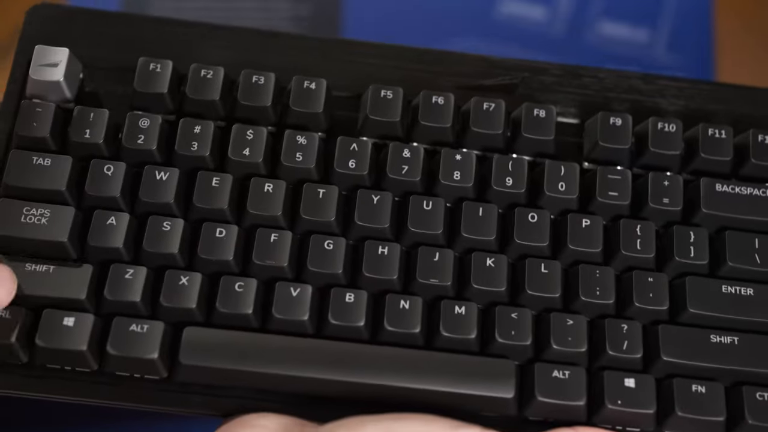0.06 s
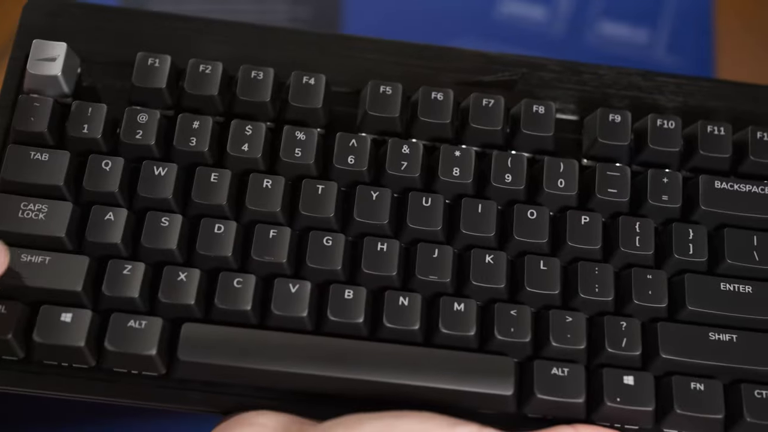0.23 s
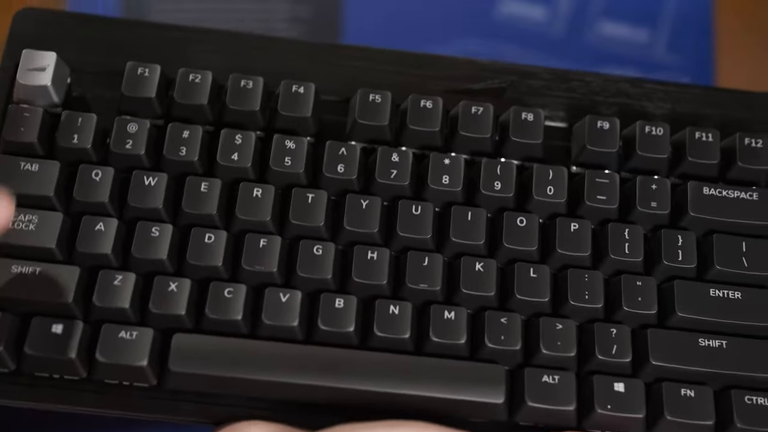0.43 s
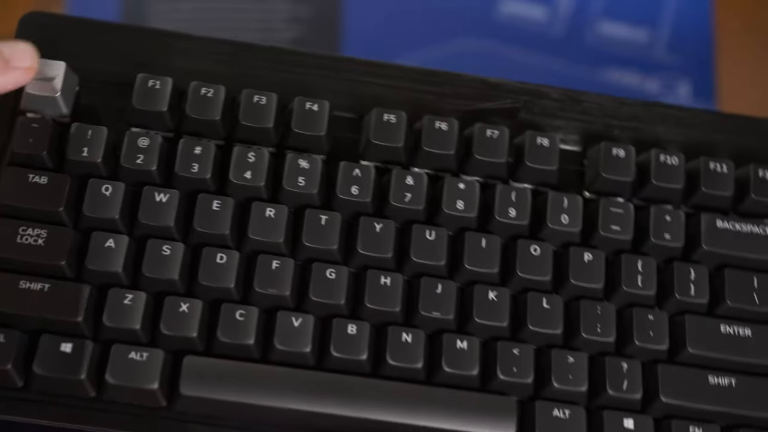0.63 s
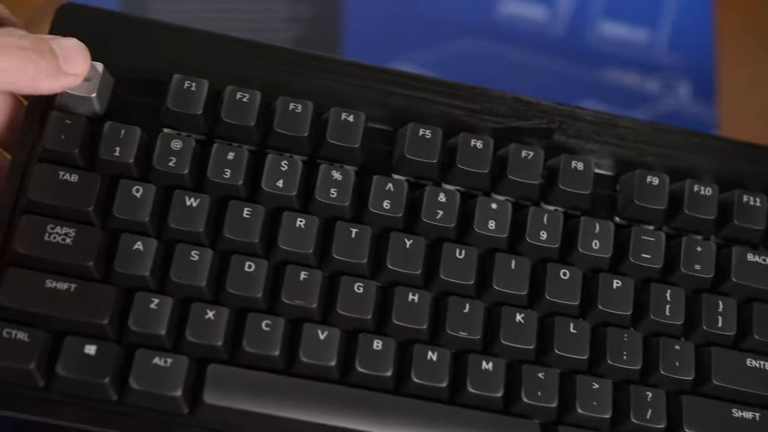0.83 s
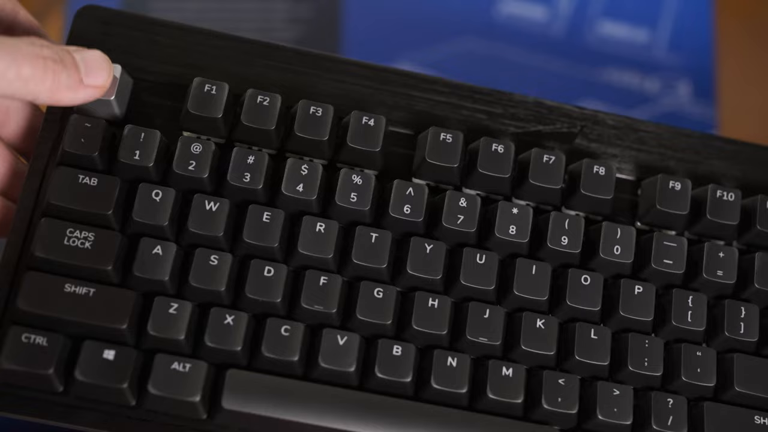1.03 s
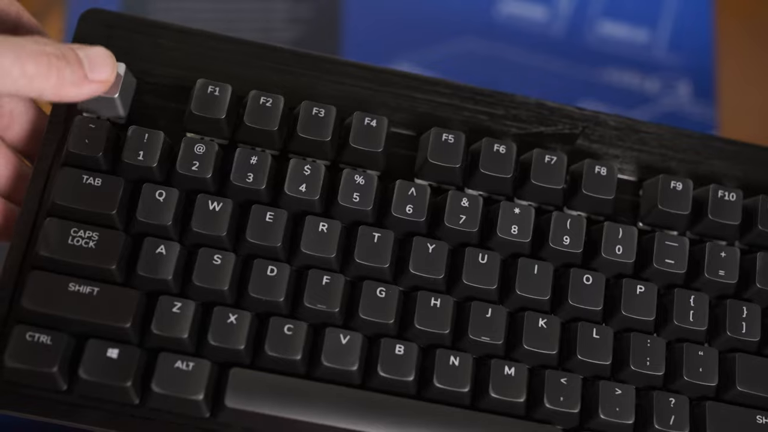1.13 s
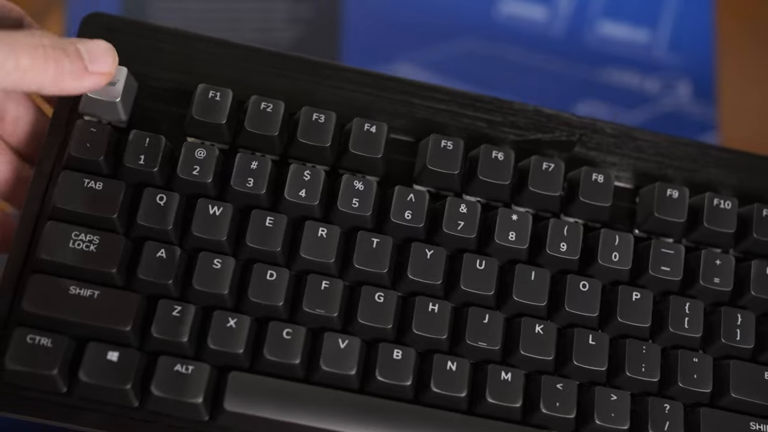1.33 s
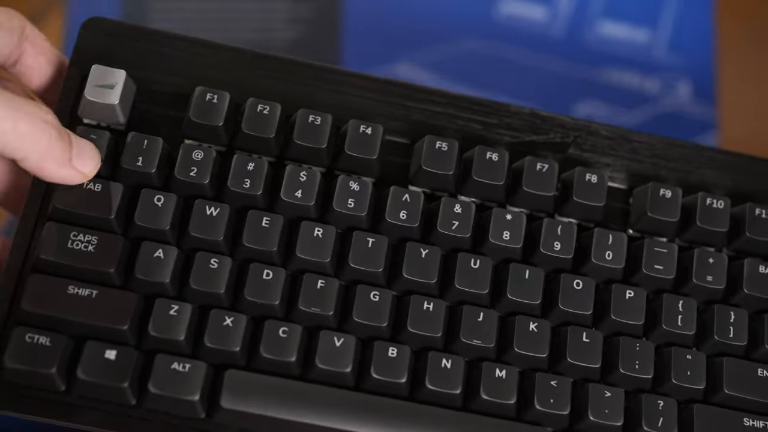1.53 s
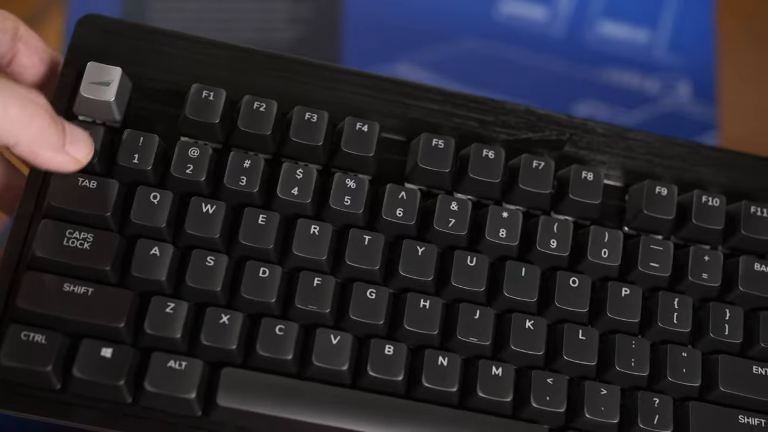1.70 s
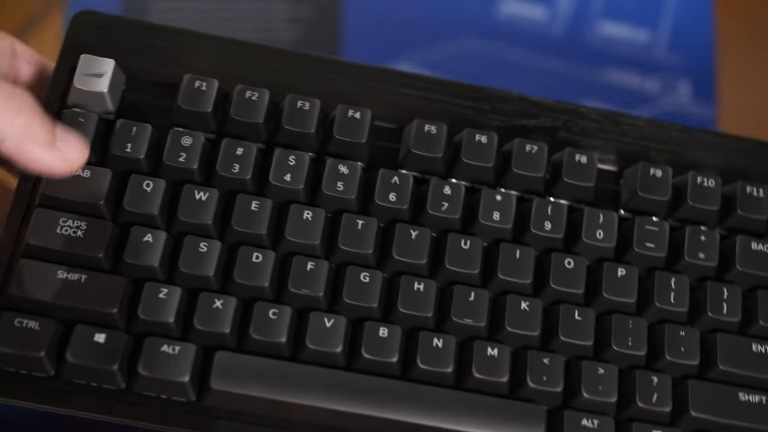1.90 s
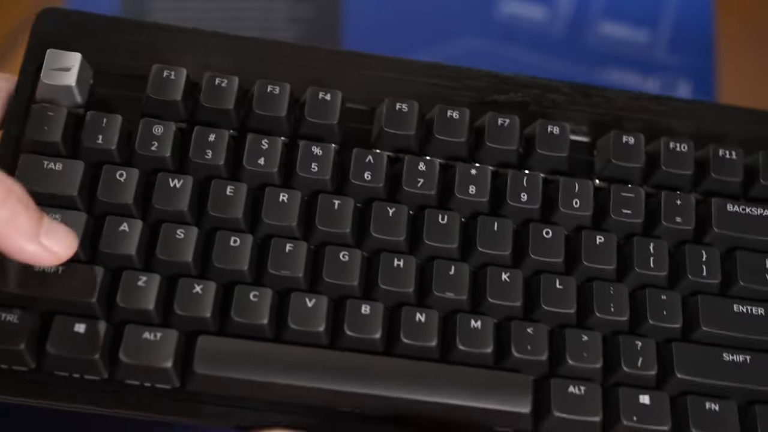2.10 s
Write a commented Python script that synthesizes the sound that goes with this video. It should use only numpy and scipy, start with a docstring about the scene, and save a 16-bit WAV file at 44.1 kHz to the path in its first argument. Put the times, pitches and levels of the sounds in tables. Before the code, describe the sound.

Seven sharp plastic key presses with softer return clicks, irregularly spaced, over a faint fan hum

```python
"""Faint fingertip ticks and a rustle come first, over a hum of fans; then a key clacks back up.
Three keys of a plastic mechanical keyboard are pressed and let go in turn, close to a mono microphone.
A key is a snap of its cap, a short ringing of the board, and bright ringing mixed with noise.
Ticks and slides of the fingertip are shaped noise; a bare room answers after a short gap.
The fans are steady coloured noise with two wavering low tones."""
import sys
import numpy as np
from scipy import signal
from scipy.fft import rfft, irfft
from scipy.io import wavfile

SR = 44100
rng = np.random.default_rng(int(sys.argv[2]) if len(sys.argv) > 2 else 0)


def how_loud(loudness_db):
    """Turn decibels into a plain amplitude multiplier (0 dB gives 1, 20 dB gives 10)."""
    steps = np.asarray(loudness_db, float) / 20
    return 10 ** steps


def transcribe(signal):
    """Save signal, clipped to [-1, 1], as a 16-bit WAV file at the path in sys.argv[1]."""
    frames = np.atleast_2d(signal).T
    limited = np.clip(frames, -1, 1)
    pcm = np.round(limited * 32767).astype(np.int16)
    wavfile.write(sys.argv[1], SR, pcm)


N = 94815   # length in samples


# a key bottoms out: start_s, level_db, board_db and treble_db (both relative to level_db)
PRESSES = [(0.2189, -12.5, -8, -14.5), (0.4103, -5.5, -9, -13.5), (0.81, -12.5, -8.5, -10.5),
           (1.0625, -15.5, -6, -9.5), (1.2263, -13, -7.5, -10), (1.5268, -14, -11.5, -8),
           (1.74, -10, -12, -10.5)]
# a key springs back to its stop, at times with a bounce:
# start_s, level_db, cap_db and board_db (both relative to level_db)
RELEASES = [(.194, -20.5, -15, -7.5), (0.9383, -14, -5, -9), (1.1703, -22.5, -17, -5),
            (1.331, -18.5, -9, -7.5), (1.3388, -27, -6.5, -12.5), (1.3402, -31.5, -28, 2.5),
            (1.6735, -16, -15.5, -12.5), (1.8823, -19.5, -8.5, -7.5), (2.138, -33, -5, -8)]
# bright ringing of a press, stem on the switch floor; one list per key: pitch_hz, strength_db, t60_s
PRESS_STEM = [
    [(6220, -7, 0.005), (6660, -5, 0.0064), (8730, -12, .004), (12100, -6, 0.0027)],
    [(5900, -7.5, 0.0061), (7520, -7.5, 0.0038), (7840, -3, 0.0038), (9050, -3.5, 0.0035),
     (14500, -11, .003)],
    [(5740, -12.5, 0.0076), (6480, -12, 0.0038), (7420, -1.5, 0.0043), (7880, -3, 0.0032),
     (8640, -19, 0.0049), (11600, -18, .003), (14100, -14, .003)],
]
# bright ringing of a release, slider on the switch lid; one list per key: pitch_hz, strength_db, t60_s
RELEASE_STEM = [
    [(6600, -9, 0.0062), (7000, -15, 0.0038), (9400, -21, 0.0074), (12000, -24, .006)],
    [(5490, -6, 0.0061), (5860, -11.5, 0.0087), (5950, -1, 0.0028), (8300, -4.5, 0.002),
     (10090, -19.5, 0.0074), (11700, -13, 0.0036)],
    [(5600, -18.5, .008), (6090, -14.5, 0.0088), (8360, -18, 0.0065), (12400, -39, 0.0044)],
]


def keys():
    """Presses and releases strike the same cap and board; their treble differs."""
    t = np.arange(SR // 10) / SR
    out = np.zeros(N + SR)
    for start_s, level_db, board_db, treble_db in PRESSES:
        press = knock(start_s, t, cap_db=0, slower=1, board_db=board_db, stem=PRESS_STEM,
                      stem_db=treble_db, crack_db=-2, spread_db=1.0)
        add(out, start_s, how_loud(level_db) * press)
    for start_s, level_db, cap_db, board_db in RELEASES:
        # the cap rings longer once the finger is off, hence slower=1.44
        release = knock(start_s, t, cap_db=cap_db, slower=1.44, board_db=board_db, stem=RELEASE_STEM,
                        stem_db=0, crack_db=-12.5, spread_db=2.0)
        add(out, start_s, how_loud(level_db) * release)
    return out[:N]


# the cap's snap, one row per key: pitch_hz, rise_s (a press peaks after twice this time)
CAPS = [(2350, 0.00019), (3000, 0.00014), (3400, 0.0002245)]
# what the board rings with, one list per key: pitch_hz, strength_db, t60_s (before the desk mat damps it)
BOARD = [
    [(544, 0, 0.017), (630, 6, 0.012), (800, -20, 0.036), (993, -19.5, 0.09), (1248, 4.4, 0.021),
     (1493, -19, 0.051), (2160, 5.5, 0.0086), (2820, -17, 0.045), (3250, 1, 0.0088), (3910, -17.5, 0.027),
     (4320, -27, 0.02)],
    [(727, -14, 0.043), (798, -12, 0.06), (1097, 3.5, 0.021), (1210, -7, 0.019), (1480, 1.9, 0.025),
     (1690, -8, 0.017), (2010, -12.5, 0.052), (2540, -0.5, 0.0074), (2800, -28, 0.006), (3000, 3.8, 0.01),
     (3300, -6, 0.021), (3940, -10, 0.013), (4460, -5.5, 0.0086), (4800, -4, 0.0077)],
    [(678, 1, 0.019), (880, -1.5, 0.033), (1088, 4, 0.016), (1191, 4.2, 0.023), (1504, 4, 0.014),
     (1626, 1.5, 0.023), (1873, -5, 0.046), (2190, 8, 0.012), (2625, 2, 0.013), (3100, 0.5, 0.012),
     (3350, -9.5, 0.025), (3700, -25, .017), (3950, 0, 0.005)],
]
# colour of the short crack: pitch_hz, density_db (per Hz, only the shape counts)
CRACK = [(3000, -4.5), (6000, -3.3), (9000, -22.5), (13000, -38), (16500, -2)]
# colour of the longer, faint rattle: pitch_hz, density_db (per Hz, only the shape counts)
RATTLE = [(1500, -1.5), (3000, -1), (6000, -7), (9000, -11), (12500, -20.5), (13500, -49)]


def knock(start_s, t, cap_db, slower, board_db, stem, stem_db, crack_db, spread_db):
    """A snap of the cap, a board that swells in and is damped, a bright stem, a crack and a faint rattle."""
    key = key_at(start_s)
    cap_hz, rise_s = CAPS[key]
    rise_s = rise_s * slower
    swell = (t / rise_s / 2) ** 2 * np.exp(2 - t / rise_s)   # reaches 1 at twice rise_s
    cap = how_loud(cap_db) * swell * np.cos(2 * np.pi * cap_hz * (t - 2 * rise_s))
    # low board tones swell in later; the desk mat then damps them all
    board_damped_s = 0.011
    board = how_loud(board_db) * ringing(BOARD[key], t, spread_db, rise_cycles=4.05)
    board = board * np.exp(-(t / board_damped_s) ** 2)
    crack_t60_s, rattle_t60_s = 0.0046, 0.037
    crack = coloured(CRACK, len(t)) * how_loud(crack_db - 60 * t / crack_t60_s)
    rattle = coloured(RATTLE, len(t)) * how_loud(-25 - 60 * t / rattle_t60_s)
    bright = ringing(stem[key], t, spread_db, rise_cycles=0.88)
    return cap + board + how_loud(stem_db) * (bright + crack + rattle)


# moments when the finger moves to the next key: change_s
KEY_CHANGES = (.6, 1.42)


def key_at(s):
    """Which key is under the finger."""
    return np.searchsorted(KEY_CHANGES, s)


def ringing(tones, t, spread_db, rise_cycles):
    """Decaying sines that swell in over a few cycles, each struck a little harder or softer by chance."""
    hz, db, t60_s = np.transpose(tones)[:, :, None]
    chance_db = spread_db * rng.standard_normal(hz.shape)
    decay = how_loud(db + chance_db - 60 * t / t60_s)
    swell = 1 - np.exp(-t * hz / rise_cycles)
    return (decay * swell * np.sin(2 * np.pi * hz * t)).sum(axis=0)


def add(out, start_s, sound):
    """Mixes a sound in at its start time."""
    first = int(start_s * SR)
    out[first:first + len(sound)] += sound


# the fingertip ticks on a loose cap: start_s, level_db (before halving and the fade),
# cap_pitch_hz, treble_db (relative to the cap noise)
TICKS = [(.0325, -43, 3000, -20), (.035, -29, 3100, -18), (.082, -52, 3000, 1), (.170, -56, 3300, -7),
         (.2785, -41, 2800, -2), (.3975, -38.5, 2870, 3), (.567, -39, 2900, -9), (.738, -42, 2690, -12),
         (.8012, -39, 3300, -5.5), (.806, -35, 3100, -19), (1.035, -22.5, 3250, -14),
         (1.0505, -33, 3200, -14), (1.203, -34, 3150, -21), (1.483, -40, 3420, -19),
         (1.522, -36, 3240, -10), (1.6427, -33, 3300, -5), (1.6517, -33.5, 3000, -3), (1.661, -44, 3350, 1),
         (1.7205, -32, 3500, -11)]
# colour of a tick's treble layer: pitch_hz, density_db (per Hz, only the shape counts)
TICK_TREBLE = [(800, -8), (1300, -4), (2200, -7), (5000, -6), (6500, -8), (7500, -17), (12000, -30)]
# the fingertip slides over a cap: start_s, length_s, level_db (before grain and fade)
SLIDES = [(0.033, 0.012, -47.5), (0.058, 0.034, -56.5), (.277, .036, -49), (.928, 0.007, -53.5),
          (1.48, 0.016, -56.5), (1.508, 0.019, -54.5), (1.722, 0.024, -51.5), (1.868, 0.01, -50.5),
          (2.129, 0.019, -54)]
# colour of a slide: pitch_hz, density_db (per Hz, only the shape counts)
SLIDE_COLOUR = [(500, 5), (1200, 2), (3000, -1.3), (4500, -7.5), (6500, -11), (9000, -14), (14000, -24)]


def fingertip():
    """Ticks are puffs of noise around the cap's pitch; slides are grainy noise that fades out."""
    t = np.arange(SR // 50) / SR
    out = np.zeros(N + SR)
    rise_s, decay_s, width_hz = 0.00024, 0.0017, 530
    for start_s, level_db, hz, treble_db in TICKS:
        peak = [(hz / 2, -25), (hz - width_hz, -9), (hz, 0), (hz + width_hz, -9), (hz * 2, -30)]
        puff = coloured(peak, len(t)) + how_loud(treble_db) * coloured(TICK_TREBLE, len(t))
        shape = (1 - np.exp(-t / rise_s)) * np.exp(-t / decay_s)
        add(out, start_s, how_loud(level_db) / 2 * puff * shape)
    for start_s, length_s, level_db in SLIDES:
        size = int(length_s * SR)
        # the level takes a new random step every 60 samples
        steps = np.repeat(rng.standard_normal(size // 60 + 1), 60)[:size]
        grain = how_loud(3.5 * steps)
        fade = np.sqrt(np.linspace(1, 0, size))
        add(out, start_s, how_loud(level_db) * coloured(SLIDE_COLOUR, size) * grain * fade)
    return out[:N]


def at_hz(points, hz):
    """Reads a table between its points, with pitch on a logarithmic axis."""
    table_hz, values = np.array(points).T
    return np.interp(np.log(hz + 1), np.log(table_hz), values)


def coloured(spectrum, size):
    """Noise shaped to the given spectrum, then scaled to an rms of 1."""
    white = rfft(rng.standard_normal(size))
    x = irfft(white * how_loud(at_hz(spectrum, np.fft.rfftfreq(size, 1 / SR))), size)
    return x / x.std()


# how long the room rings: pitch_hz, t60_s
ROOM_T60 = [(400, 0.51), (1000, 0.42), (2500, 1.1), (5000, 0.78), (10000, 0.72)]
# how strongly the room answers, before its overall level: pitch_hz, strength_db
ROOM_COLOUR = [(400, 14), (1000, 2), (2000, 1.7), (3300, -2), (4600, 2.8), (7000, -4.5), (10000, 3),
               (13000, -20)]


def room(x):
    """Diffuse noise that starts after the first walls answer and dies band by band."""
    gap_s, level_db, early_db, early_t60_s = 0.016, -16.5, 0.5, 0.027
    t = np.arange(SR) / SR
    response = np.zeros(SR)
    white = rng.standard_normal((2, SR))
    edges = 250 * 2 ** np.arange(0, 6.4, .5)   # half-octave bands
    for k, (low, high) in enumerate(zip(edges, edges[1:])):
        sos = signal.butter(2, [low, high], "band", fs=SR, output="sos")
        band = signal.sosfilt(sos, white[k % 2])   # neighbouring bands use different noise
        hz = np.sqrt(low * high)
        response = response + band * how_loud(at_hz(ROOM_COLOUR, hz) - 60 * t / at_hz(ROOM_T60, hz))
    early_boost = 1 + how_loud(early_db - 60 * t / early_t60_s)
    response = response * early_boost * how_loud(level_db) / np.sqrt(SR / 10)
    return np.r_[np.zeros(int(gap_s * SR)), signal.fftconvolve(x, response)][:N]


# colour of the broad hum: pitch_hz, density_db (per Hz, only the shape counts)
HUM = [(12, -37), (20, -17.5), (148, -4), (401, -15.5), (617, -19), (853, -21.5), (1000, -20), (1120, -23),
       (1250, -21.5), (1630, -28), (2080, -24), (2510, -37.5), (3040, -25), (4090, -34.5), (5500, -41),
       (11100, -45), (12700, -28.5), (16500, -77), (22000, -120)]
# wavering low tones: pitch_hz, width_hz, level_db (rms)
FAN_TONES = [(130.2, 10.5, -61), (186.2, 14, -61)]


def fans():
    """Broad room noise, plus two wavering low tones made by sharply filtering noise."""
    out = how_loud(-53) * coloured(HUM, N)
    for hz, width_hz, level_db in FAN_TONES:
        r = np.exp(-np.pi * width_hz / SR)
        feedback = [1, -2 * r * np.cos(2 * np.pi * hz / SR), r * r]
        # one second of run-in is thrown away, so the tone is already steady
        tone = signal.lfilter([1, 0, -1], feedback, rng.standard_normal(N + SR))[SR:]
        out = out + how_loud(level_db) * tone / tone.std()
    return out


def dull(x):
    """Cuts the top off faint sounds with a steep low-pass at 12800 Hz."""
    return signal.sosfilt(signal.cheby2(10, 40, 12800, fs=SR, output="sos"), x)


def scene():
    """All sources reach one microphone, copied to two channels."""
    hits, touches = keys(), fingertip()
    faint = touches + room(hits + touches) + fans()
    return np.tile(hits + dull(faint), (2, 1))


# colour of the hiss between the channels: pitch_hz, density_db (per Hz, only the shape counts)
SIDE_HISS = [(18, -31), (30, -8), (70, -7), (179, -28), (404, -15), (801, -18), (1320, -19), (3580, -21),
             (4650, -15), (10500, -16), (16000, 1)]


def side(dry):
    """What sets the channels apart: faint hiss, and noise that follows the sound sample by sample."""
    hiss = how_loud(-63.5) * dull(coloured(SIDE_HISS, N))
    flutter = how_loud(-58) * dry[0] * rng.standard_normal(N)
    return hiss + flutter


def top_cut(x):
    """Nothing passes above the cut-off."""
    return signal.sosfilt(signal.butter(12, 16830, fs=SR, output="sos"), x)


def record(dry):
    """The side noise is added with opposite signs in the two channels; the top is cut at 16850 Hz."""
    x = dry + side(dry) * [[1], [-1]]
    mix = signal.sosfilt(signal.cheby2(12, 70, 16850, fs=SR, output="sos"), x)
    return top_cut(mix)


dry = scene()
out = record(dry)
transcribe(out)
```